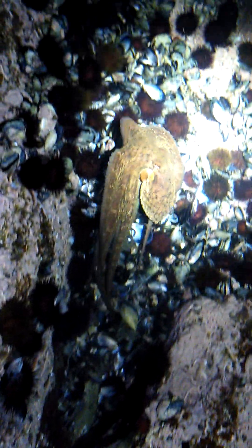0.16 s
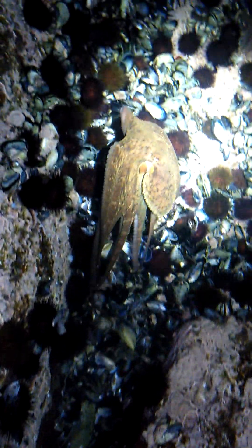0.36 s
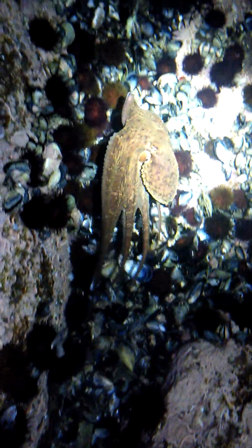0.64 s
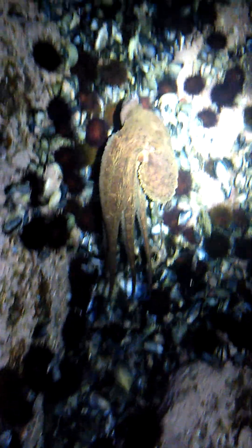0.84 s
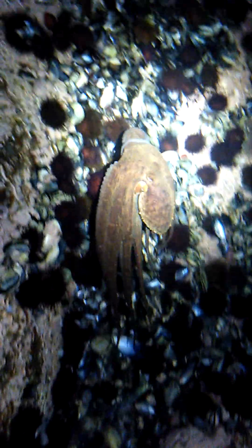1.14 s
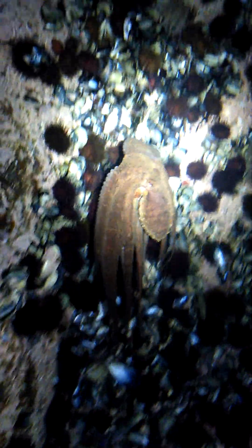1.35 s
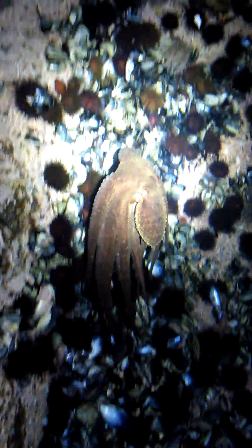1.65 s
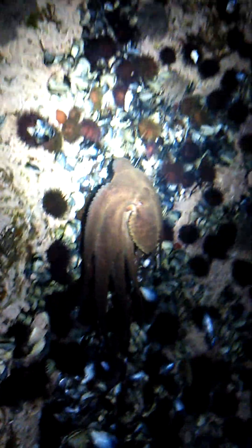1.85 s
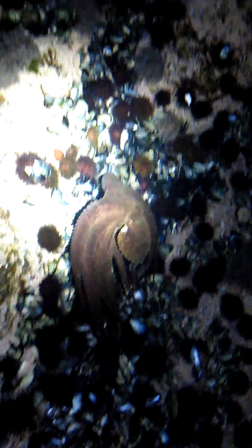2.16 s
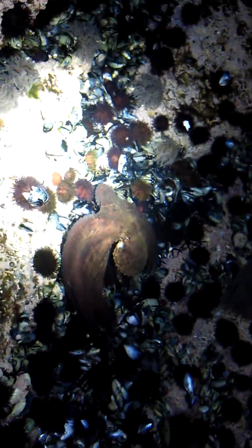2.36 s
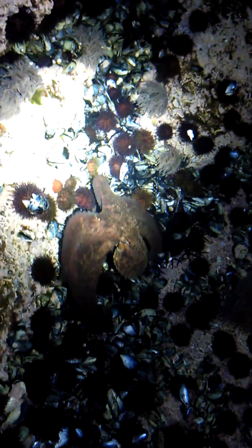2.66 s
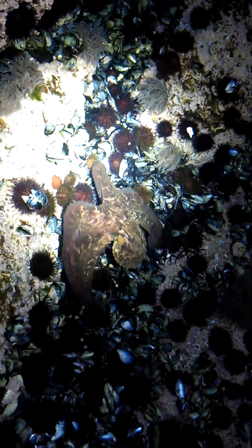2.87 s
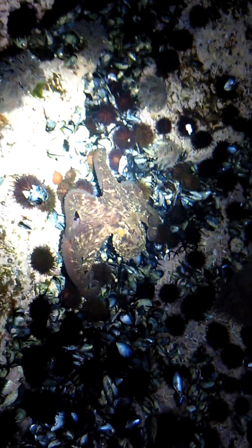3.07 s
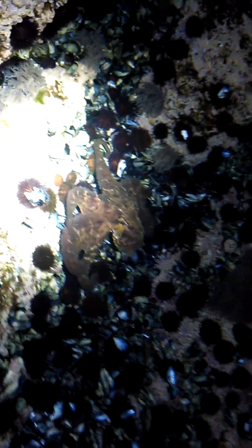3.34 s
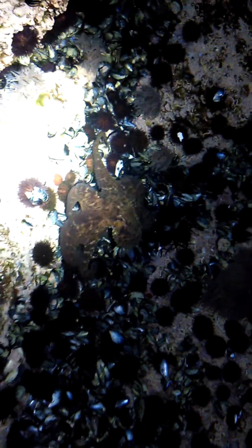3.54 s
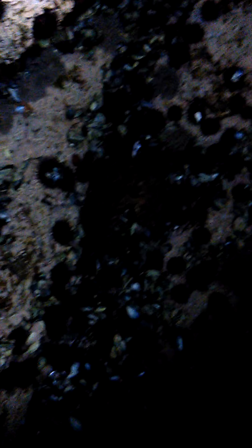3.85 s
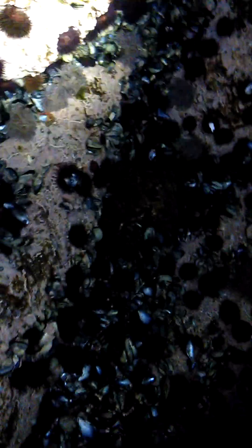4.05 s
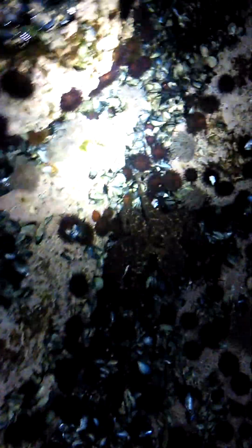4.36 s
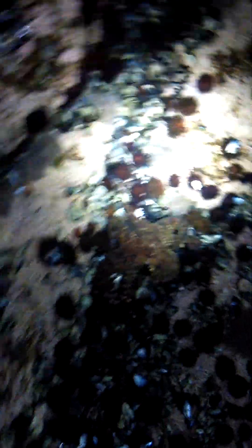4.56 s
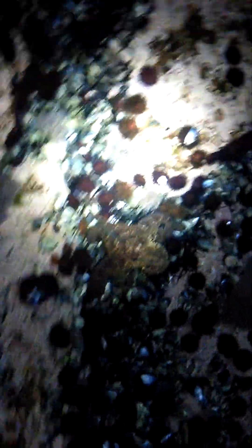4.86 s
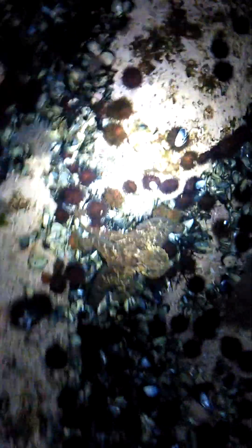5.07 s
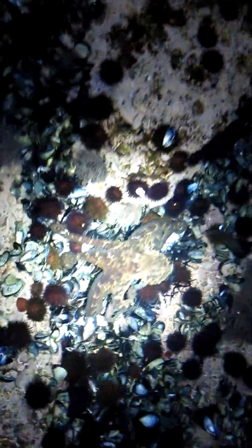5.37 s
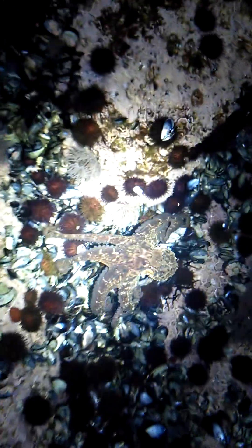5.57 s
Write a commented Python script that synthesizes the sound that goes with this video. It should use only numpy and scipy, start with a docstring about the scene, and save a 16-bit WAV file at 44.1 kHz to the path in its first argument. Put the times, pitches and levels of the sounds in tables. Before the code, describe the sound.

A steady, deep surf rumble lies under the whole scene, with a faint, high wet fizz from the shore. From about 0.15 s, mussel shells close to the microphone begin to snap under shifting weight, probably footsteps: small ticks first, then sharper cracks, building to a hard crunch around 1.2-1.4 s. Another cluster of bright snaps comes at 1.75-1.95 s. Then breaking thins to scattered clicks, with one strong crack near 2.7 s. A loose stone knocks shortly at 3.05 and 3.3 s, and the watery fizz swells softly around 3.6 s. At 3.75 s a second, denser bout starts, with gritty crunches, rapid snaps and tiny muffled squelches until about 4.85 s. After a brief easing with a small wet spurt near 5 s, crunching returns from 5.17 to 5.45 s, ending with a last snap at 5.6 s. Echo is very short; the sharpest cracks sound slightly flattened.

```python
"""Night on a rocky shore, close to an octopus creeping over a bed of wet mussel shells; surf rumbles throughout.
From 0.15 s shifting weight, probably footsteps, crushes the shells: filtered noise bursts make single snaps,
dense random fractures make crunches, and water squelches as resonant spurts. Towards 3 s the breaking thins out
and a loose stone starts to knock, as decaying sines; near 3.6 s the shore's noise fizz swells as water seeps.
From 3.75 s a second, denser bout of crushing runs to 5.6 s. The rocks add a very short echo to all but the shore."""
import sys
import numpy as np
from scipy import signal
from scipy.fft import rfft, irfft
from scipy.io import wavfile
from scipy.ndimage import uniform_filter1d

SR = 44100
rng = np.random.default_rng(int(sys.argv[2]) if len(sys.argv) > 2 else 0)


def inscribe(sig):
    """Save sig as 16-bit PCM at rate SR to the path in sys.argv[1].

    A 1-D sig is mono; a 2-D sig holds one channel per row.
    Samples are clipped to [-1, 1] before scaling.
    """
    pcm = np.round(np.clip(np.atleast_2d(sig).T, -1, 1) * 32767)
    wavfile.write(sys.argv[1], SR, pcm.astype(np.int16))


N = 251811
TIME = np.arange(N) / SR
SNAP_SAMPLES = 1024

# big shells snapping: [t/s, nominal peak level/dB, hollow body re peak/dB, ring re peak/dB]
BIG_SNAPS = [(0.1511, -22, -27.5, -10), (0.3413, -20.5, -24, -14), (0.4145, -12, -19, -19),
             (0.4928, -16, -24, -20), (0.6204, -9.5, -29, -8.5), (0.704, -1, -20.5, -20.5),
             (0.7804, -19, -45, -20), (0.822, -8, -34.5, -22), (0.8308, -9, -20.5, -14),
             (0.9082, -21.5, -26.5, -16), (0.9734, -20.5, -23, -15), (1.0103, -6.5, -28, -12),
             (1.1086, -15, -28, -25), (1.1381, -5.5, -38, -20.5), (1.1643, -7, -40, -22),
             (1.2412, 0, -19.5, -10.5), (1.2514, -6.5, -14.5, -4), (1.295, 3, -39, -31),
             (1.316, -9, -31, -4), (1.333, 0.5, -23.5, -13.5), (1.3522, -4, -19, -16),
             (1.388, -12.5, -24, -31), (1.3934, -9, -42, -35), (1.4525, -15.5, -21, -33),
             (1.5075, -17, -34, -20), (1.6688, -7.5, -18, -15), (1.697, -13.5, -36, -15),
             (1.7756, 2, -34.5, -21.5), (1.7867, -6, -43, -34), (1.8108, -4, -32, -24),
             (1.8482, -15, -21, -17), (1.8659, -2, -32, -21), (1.8845, 1.5, -32, -23),
             (1.9274, -15, -31, -20), (1.9369, 1.5, -38, -27), (1.9469, -11, -31, -8),
             (2.033, -12.5, -27.5, -18), (2.2536, -19.5, -30, -17), (2.3075, -16, -34, -17),
             (2.5513, -22.5, -26, -13.5), (2.592, -14.5, -41, -36), (2.6648, -22.5, -19, -17),
             (2.6895, -22, -16, -14), (2.7264, 3, -34, -24), (3.005, -6.5, -28.5, -19),
             (3.2755, -11.5, -20.5, -12.5), (3.7642, -4, -33, -18), (3.77, -9, -28, -8.5),
             (3.7902, -7, -16, -4), (3.8097, -8.5, -26, -16), (4.008, -8, -31, -16), (4.0402, -4, -31, -14),
             (4.0802, -1.5, -27, -21), (4.1154, -1.5, -28, -11.5), (4.136, -4, -17.5, -8.5),
             (4.156, -3.5, -31, -9), (4.2269, -4, -20, -15.5), (4.2474, -1, -27.5, -18),
             (4.3276, -7, -30, -18), (4.3503, 0, -28.5, -20.5), (4.4132, -4.5, -32, -18),
             (4.4178, -8.5, -22.5, -19), (4.4368, -1.5, -31, -16.5), (4.4699, -9.5, -23, -15),
             (4.5048, 0, -38, -14), (4.5401, -10, -33, -26), (4.5705, -3, -31, -31),
             (4.5835, -0.5, -31, -23), (4.604, -2, -21, -11.5), (4.6427, -13.5, -18.5, -19),
             (4.6954, -11.5, -17, -12), (4.7585, -0.5, -29, -13), (4.8222, 4.5, -42, -33),
             (5.218, -1.5, -18, -9), (5.275, -4, -31, -15.5), (5.2991, -2, -23, -17),
             (5.3555, -8, -31, -17), (5.3772, -7, -27, -15.5), (5.4294, -10.5, -19, -2.5),
             (5.4536, -22, -34, -3), (5.6246, -8.5, -25.5, -14.5)]
# mode offsets; knock is on top of the body level, splinter has its own law
CRACK_DB, BODY_DB, RING_DB, KNOCK_DB, SPLINTER_DB = -11.5, -3.5, -4, -11.5, -29
SPLINTER_DB_PER_PEAK_DB, SPLINTER_DB_PER_WEIGHT_DB = 0.83, 0.12
FORECRACK_MEAN_S, FORECRACK_DB = 0.0024, -25
FRAGMENT_MEAN_S, FRAGMENT_DB = 0.011, -20.5


def snaps():
    """Big shells break one by one: faint first crack, break, falling fragment; hollow ones also knock."""
    t_s, peak_db, body_db, ring_db = np.transpose(BIG_SNAPS)
    weight_db, = curves(WEIGHT_CURVE)
    load_db = np.interp(t_s, TIME, weight_db - weight_db.mean())
    splinter_db = SPLINTER_DB + SPLINTER_DB_PER_PEAK_DB * peak_db + SPLINTER_DB_PER_WEIGHT_DB * load_db
    hollow_db = peak_db + body_db
    mode_db = np.column_stack([peak_db + CRACK_DB, hollow_db + KNOCK_DB, hollow_db + BODY_DB,
                               peak_db + ring_db + RING_DB, splinter_db])
    early, late = rng.uniform(.5, 1.5, (len(t_s), 2)).T
    times_s = np.concatenate([t_s - FORECRACK_MEAN_S * early, t_s, t_s + FRAGMENT_MEAN_S * late])
    levels_db = np.vstack([mode_db + FORECRACK_DB, mode_db, mode_db + FRAGMENT_DB])
    return shatter(times_s, levels_db, rise_s=.00075, crack_s=.00062, chatter_s=.0024, chatter_db=-15,
                   pitch_scatter=.083, damping=1.1)


def small_snaps(level_db=-34, db_per_weight_db=1.0, knock_db=-24, body_db=-17, ring_db=-9,
                splinter_db=-11, count=120):
    """Thin shells snap at random times, more often and harder as the weight grows."""
    weight_db, = curves(WEIGHT_CURVE)
    load_db = weight_db - weight_db.mean()
    at = paced_samples(.6 * load_db, count)
    size_db = rng.uniform(-8, 3, count)
    # a thin shell bears only so much: growth stops 4 dB above the mean load
    crack_db = level_db + size_db + db_per_weight_db * np.minimum(load_db[at], 4)
    mode_db = crack_db[:, None] + np.array([0, knock_db, body_db, ring_db, splinter_db])
    mode_db = mode_db + 2 * rng.standard_normal((count, len(SHELL_MODES)))
    return shatter(TIME[at], mode_db, rise_s=.00057, crack_s=.0005, chatter_s=.0041, chatter_db=-18,
                   pitch_scatter=.06, damping=1.0)


# breaking-shell resonances: crack, knock, body, ring, splinter: [f/Hz, width before damping/Hz]
SHELL_MODES = [(8840, 1560), (790, 910), (2243, 1010), (5493, 840), (13000, 1900)]


def shatter(times_s, mode_db, rise_s, crack_s, chatter_s, chatter_db, pitch_scatter, damping):
    """A noise force cracks and chatters for milliseconds, exciting each shell's own detuned resonances."""
    t = np.arange(SNAP_SAMPLES) / SR
    decay = np.exp(-t / crack_s) + undb(chatter_db) * np.exp(-t / chatter_s)
    envelope = (1 - np.exp(-t / rise_s)) * decay
    force = rng.standard_normal((len(times_s), SNAP_SAMPLES)) * envelope
    detune = np.exp(pitch_scatter * rng.uniform(-1, 1, (len(times_s), len(SHELL_MODES))))
    level_span = .004 * SR  # ring energy is referred to 4 ms
    sounds = 0
    for k, (hz, width_hz) in enumerate(SHELL_MODES):
        ring = resonate(force, hz * detune[:, k, None], width_hz * damping)
        rms = np.sqrt(np.sum(ring ** 2, axis=1, keepdims=True) / level_span)
        sounds = sounds + ring * undb(mode_db[:, k, None]) / rms
    out = np.zeros(N)
    for t_s, sound in zip(times_s, sounds):
        add(out, t_s, sound)
    return out


# weight resting on the bed, as nominal rustle level: [t/s, level/dB]
WEIGHT_CURVE = [(0, -62), (0.5, -48), (0.92, -48), (1.05, -40), (1.22, -35), (1.46, -38), (1.6, -49),
                (1.76, -38), (1.95, -42), (2.07, -57), (3.73, -56), (3.8, -42), (4.08, -36), (4.3, -43),
                (4.7, -43), (5.15, -48), (5.35, -36), (5.57, -53), (5.71, -53)]
# colour of the finest fractures: [f/Hz, relative level/dB]
GRIT_COLOUR = [(2500, -47), (3900, -23), (4700, -2), (5450, -6), (6200, -0.5), (7200, -3.5), (8400, 7),
               (9400, -3), (11300, -3.5), (13500, -7), (16000, -20)]
# colour of shells grinding deeper in the bed: [f/Hz, relative level/dB]
DEEP_COLOUR = [(250, -25), (600, -7.5), (950, 1), (1400, 1), (2000, 4.5), (2500, 3.5), (3500, -3),
               (5000, -12)]
# colour of shells that shift without breaking: [f/Hz, relative level/dB]
RUSTLE_COLOUR = [(2500, -49), (3900, -16), (5500, -5), (7000, -4), (8300, -6), (9300, -1), (11000, -3),
                 (13500, -27), (16000, -25)]
WEIGHT_GRIT_DB, WEIGHT_DEEP_DB = 0, -12.5
LIGHT_BREAKS_PER_S, BREAK_GROWTH_PER_DB = 110, .14  # rate at lightest load; exponent per dB of load


def shell_bed(grit_db=-5.5, rustle_db=-5, crunch_db=-1.0):
    """The bed rustles under weight and grinds jerkily in crunches; breaks come faster as the load grows."""
    weight_db, = curves(WEIGHT_CURVE)
    resting = undb(weight_db + np.array([[WEIGHT_GRIT_DB], [WEIGHT_DEEP_DB]])) ** 2
    crushing = pressure()
    bright_db, deep_db = 10 * np.log10(resting + crushing)
    rate_per_s = LIGHT_BREAKS_PER_S * np.exp(BREAK_GROWTH_PER_DB * (bright_db - bright_db.min()))
    breaks = fractures(rate_per_s, spread_db=7, decay_s=.0006)
    breaks = breaks * jerks(rate_per_s=170, decay_s=.0018, steady=.16)
    rustle = colour(breaks * undb(weight_db + rustle_db), RUSTLE_COLOUR)
    grit = colour(breaks * np.sqrt(crushing[0]) * undb(grit_db), GRIT_COLOUR)
    deep = colour(breaks * undb(deep_db + crunch_db), DEEP_COLOUR)
    return rustle + grit + deep + chips(bright_db, deep_db)


# bed giving way: [t/s, hold/s, nominal bright grit level/dB, nominal deep crunch level/dB]
CRUNCH_EVENTS = [(0.488, .012, -39, -56), (1.241, .05, -17, -27.5), (1.292, .045, -24, -32),
                 (3.76, .015, -28.5, -33), (3.794, .04, -31.5, -36), (3.858, .07, -27, -34),
                 (3.979, .05, -31, -41), (4.043, .07, -25, -38), (4.121, .06, -23, -35.5),
                 (4.181, .03, -27, -42), (4.25, .02, -32, -43), (4.345, .015, -31, -44),
                 (4.412, .01, -28, -50), (4.435, .015, -21.5, -36), (4.529, .03, -34.5, -44),
                 (4.567, .045, -22, -40), (4.69, .02, -33.5, -40.5), (4.759, .05, -16, -37),
                 (4.821, .04, -29.5, -38), (4.958, .025, -37, -42), (5.174, .05, -23, -34.5),
                 (5.24, .03, -30, -37), (5.281, .025, -20.5, -34), (5.35, .035, -27, -43.5),
                 (5.425, .035, -20.5, -37.5)]
CRUNCH_ATTACK_S, CRUNCH_RELEASE_S = 0.0055, .012


def pressure():
    """Bright and deep crunch power: each event sets in linearly, holds and dies away exponentially."""
    power = np.zeros((2, N))
    for t_s, hold_s, bright_db, deep_db in CRUNCH_EVENTS:
        attack = np.clip((TIME - t_s) / CRUNCH_ATTACK_S, 0, 1)
        release = np.exp(-np.clip((TIME - t_s - hold_s) / CRUNCH_RELEASE_S, 0, 20))
        power = power + (undb([[bright_db], [deep_db]]) * attack * release) ** 2
    return power


def fractures(rate_per_s, spread_db, decay_s):
    """Random tiny breaks of very unequal size, each a short decaying noise burst, locally levelled."""
    chance, size = rng.random(N), np.minimum(rng.exponential(size=N), 3)
    energy = (chance < rate_per_s / SR) * undb(spread_db * size) ** 2
    energy = signal.lfilter([1], [1, -np.exp(-2 / (decay_s * SR))], energy)
    # the load is shared: breaks close together are each weaker
    load = uniform_filter1d(energy, size=1500)
    return np.sqrt(np.abs(energy / (load + .02 * load.mean()))) * rng.standard_normal(N)


def jerks(rate_per_s, decay_s, steady):
    """Gain of a load slipping in uneven, fast-fading jerks over a steady share; mean power 1."""
    size = np.minimum(rng.exponential(size=N), 3)
    starts = (rng.random(N) < rate_per_s / SR) * size
    slips = signal.lfilter([1], [1, -np.exp(-1 / (decay_s * SR))], starts)
    nearby = uniform_filter1d(slips, size=2200) + .1 * slips.mean()
    return unit(np.sqrt(steady + slips / nearby))


def chips(bright_db, deep_db, chip_db=-2.5, knock_db=-9, body_db=-5, ring_db=-9, splinter_db=-14, count=650):
    """Small chips tick unevenly, faster and louder under load, each with a random balance of modes."""
    at = paced_samples(.4 * bright_db, count)
    size_db = rng.uniform(-9, 5, count)
    depth_db = (deep_db - bright_db)[at]
    # depth raises knock and body only
    shares_db = np.array([knock_db, body_db, ring_db, splinter_db]) + np.outer(depth_db, [1, 1, 0, 0])
    shares_db = shares_db + rng.uniform(-7, 7, (count, 4))
    crack_db = bright_db[at] + size_db + chip_db
    mode_db = crack_db[:, None] + np.pad(shares_db, ((0, 0), (1, 0)))
    return shatter(TIME[at], mode_db, rise_s=.0002, crack_s=.0004, chatter_s=.002, chatter_db=-16,
                   pitch_scatter=.09, damping=.85)


# loose-stone knocks: [t/s, nominal level/dB, brightness/(dB/octave), pitch ratio]
STONE_KNOCKS = [(3.0627, -10.5, 2.5, 1.01), (3.3009, -11.5, -0.5, 0.96), (3.7644, -18, 2.5, 0.92),
                (4.0562, -15.5, -5.5, 1.55), (4.729, -21.5, -0.5, 1.08), (5.177, -23, -0.5, 0.85)]
# stone modes: [f at pitch ratio 1/Hz, t60/s, relative level/dB]
STONE_MODES = [(665, 0.013, -3), (967, 0.0084, 2.5), (2060, 0.0089, -4), (2820, 0.0055, -12),
               (5000, 0.0041, 4.5), (5400, 0.015, -7.5), (5940, 0.0039, 0.5), (7550, 0.0052, -5),
               (8600, 0.0075, -5), (11250, 0.0039, -5), (14100, 0.0031, -10)]


def stones(contact_s=0.0008):
    """A loose stone rocks against the bed, ringing decaying modes; softer contact weakens the high ones."""
    out, t = np.zeros(N), TIME[:SR // 20]
    hz, t60_s, mode_db = np.transpose(STONE_MODES)[:, :, None]
    for t_s, level_db, tilt_db_per_octave, pitch in STONE_KNOCKS:
        decay_db = mode_db + tilt_db_per_octave * np.log2(hz / hz[0]) - 60 * t / t60_s
        modes = undb(decay_db) * np.sin(2 * np.pi * hz * pitch * t)
        # neighbouring modes have opposite sign at the contact
        ring = modes[::2].sum(axis=0) - modes[1::2].sum(axis=0)
        add(out, t_s, undb(level_db) * ring * (1 - np.exp(-t / contact_s)))
    return out


# water squeezed between shells: [t/s, length/s, f/Hz, width/Hz, level/dB]
WATER_SQUELCHES = [(0.489, 0.034, 2286, 450, -42), (1.19, 0.043, 865, 500, -43),
                   (1.596, 0.0065, 1640, 510, -35.5), (3.869, 0.089, 2200, 1600, -38),
                   (4.128, 0.049, 1070, 900, -34.5), (4.965, 0.0203, 4270, 1300, -35),
                   (4.97, 0.043, 2130, 330, -42.5), (5.019, 0.019, 3200, 600, -52),
                   (5.17, 0.023, 636, 500, -36)]


def squelches():
    """Spurts of tiny bubbles, as random noise bursts, ring in the gaps between shells."""
    out, bubbles = np.zeros(N), fractures(rate_per_s=900, spread_db=2, decay_s=.0004)
    for t_s, length_s, hz, width_hz, level_db in WATER_SQUELCHES:
        start, size = int(t_s * SR), int(length_s * SR)
        spurt = bubbles[start:start + size] * signal.windows.tukey(size)
        ring = resonate(np.pad(spurt, (0, SNAP_SAMPLES)), hz, width_hz)
        add(out, t_s, ring * undb(level_db) / np.sqrt(np.sum(ring ** 2) / size))
    return out


def rocks(x, echo_db=-17, decay_s=0.0085):
    """Nearby stones scatter a weak, dense echo that starts after 3 ms and fades within hundredths of a second."""
    t = TIME[:SR // 10]
    response = rng.standard_normal(len(t)) * np.exp(-t / decay_s) * (t > .003)
    return x + undb(echo_db) * signal.fftconvolve(x, response / np.linalg.norm(response))[:N]


# distant surf colour: [f/Hz, relative level/dB]
SURF_COLOUR = [(22, -42), (32, -22), (45, -4.5), (70, 0.5), (95, -1), (125, 0), (170, -2), (287, -9),
               (420, -15.5), (600, -21), (800, -28), (1200, -29.5), (2100, -28.5), (2700, -34), (3700, -46),
               (5200, -43), (14000, -72)]
# wet-shore fizz colour: [f/Hz, relative level/dB]
FIZZ_COLOUR = [(3000, -6), (4000, -10.5), (5500, 1), (7000, -6.5), (8400, 11), (9500, 1.5), (11500, -8),
               (16000, -7)]
# slow surf swell: [t/s, level/dB]
SURF_SWELL = [(0.0, -36), (2.05, -35), (3.88, -35), (3.96, -32), (4.26, -35), (5.71, -31.5)]
SEEP_S, SEEP_HALF_S, SEEP_DB = 3.57, 0.36, 7  # centre, Gaussian half length to 1/e, peak rise in dB


def shore(surf_db=0, fizz_db=-55, fizz_waver_db=3.5):
    """Distant surf rumbles as slowly swelling noise; the wet shore fizzes unevenly, more as water seeps."""
    swell_db, = curves(SURF_SWELL)
    surf = colour(rng.standard_normal(N), SURF_COLOUR) * undb(swell_db + surf_db)
    waver = unit(uniform_filter1d(rng.standard_normal(N), size=900))
    seep_db = SEEP_DB * np.exp(-((TIME - SEEP_S) / SEEP_HALF_S) ** 2)
    fizz_gain = undb(fizz_db + seep_db + fizz_waver_db * waver)
    return surf + colour(rng.standard_normal(N), FIZZ_COLOUR) * fizz_gain


def undb(db):
    """Decibels to gain."""
    return 10 ** (np.asarray(db) / 20)


def unit(x):
    """Scale to rms 1."""
    return x / np.sqrt(np.mean(x ** 2))


def curves(table):
    """Columns after t/s, joined by straight lines."""
    t_s, *columns = np.transpose(table)
    return [np.interp(TIME, t_s, c) for c in columns]


def paced_samples(pace_db, count):
    """Jittered event positions in samples, denser where the pace is higher."""
    pace = np.cumsum(undb(pace_db))
    return np.searchsorted(pace, (np.arange(count) + rng.random(count)) / count * pace[-1])


def colour(x, points):
    """Minimum-phase filter of unit power gain following the shape of (f/Hz, level/dB) points."""
    hz, db = np.transpose(points)
    size = 8192
    f = np.maximum(np.fft.rfftfreq(size, 1 / SR), 1)
    cepstrum = irfft(np.log(undb(np.interp(np.log(f), np.log(hz), db))))
    # fold the cepstrum to make the response causal
    cepstrum[1:size // 2] *= 2
    cepstrum[size // 2 + 1:] = 0
    response = irfft(np.exp(rfft(cepstrum)))
    return signal.fftconvolve(x, response / np.linalg.norm(response))[:len(x)]


def resonate(x, hz, width_hz):
    """Two equal resonances in series along the last axis; width is that of each."""
    size = x.shape[-1]
    f = np.maximum(np.fft.rfftfreq(size, 1 / SR), 1)
    return irfft(rfft(x) / (1 + 1j * (f * f - hz * hz) / (f * width_hz)) ** 2, size)


def add(out, t_s, x):
    """Mix a short sound in at a time."""
    i = int(np.clip(t_s * SR, 0, N - 1))
    out[i:i + len(x)] += x[:N - i]


def scene():
    """Breaking shells, stone and water among echoing rocks, over the shore."""
    close = snaps() + small_snaps() + shell_bed() + stones() + squelches()
    return (rocks(close) + shore())[None]


TOP_HZ = 15900


def record(dry):
    """Soft saturation flattens the sharpest snaps; a steep low-pass cuts the top."""
    flattened = dry / (1 + (dry / .8) ** 4) ** (1 / 4)
    return signal.sosfilt(signal.ellip(8, .2, 70, TOP_HZ, fs=SR, output="sos"), flattened)


dry = scene()
out = record(dry)
inscribe(out)
```